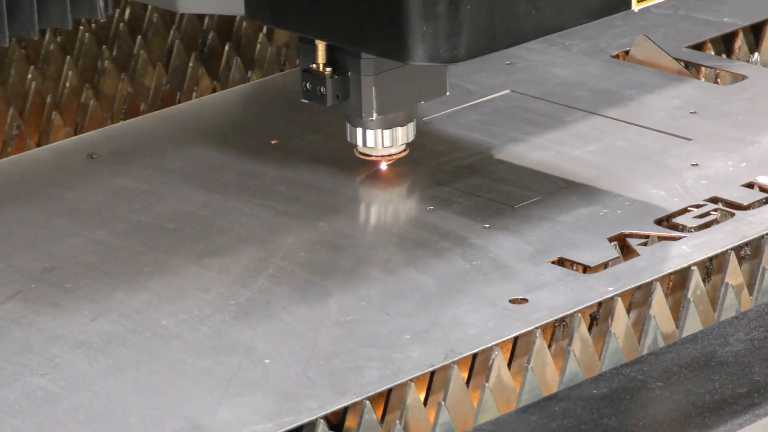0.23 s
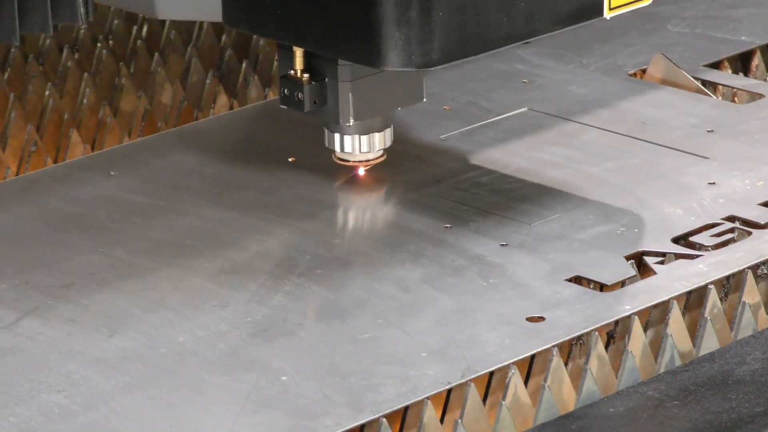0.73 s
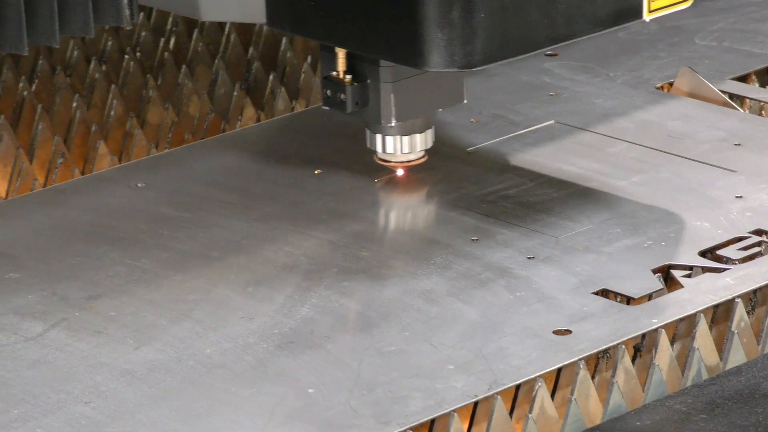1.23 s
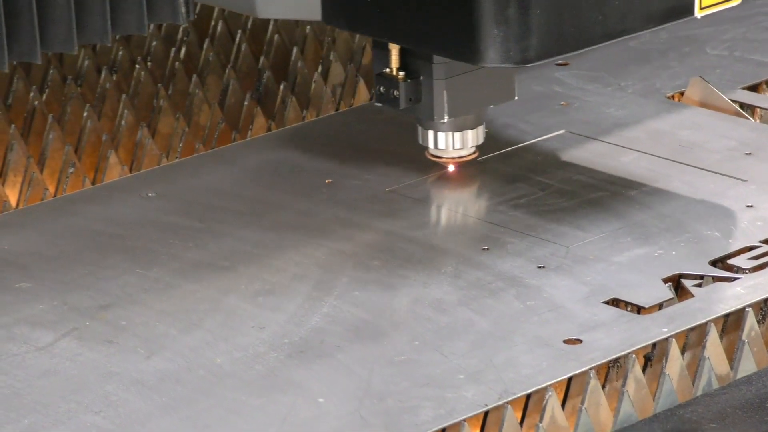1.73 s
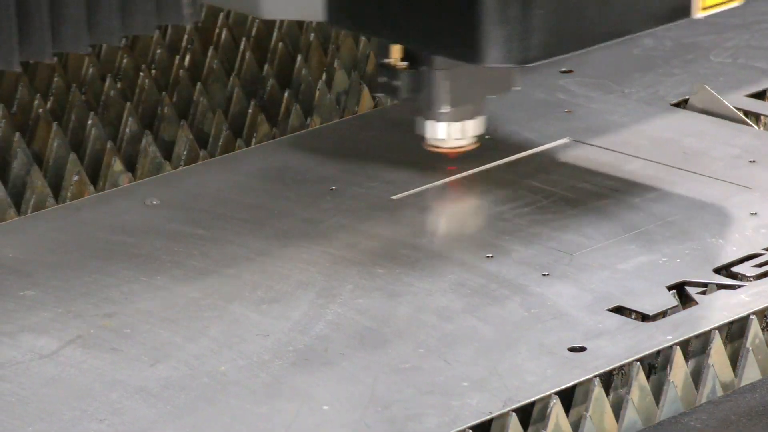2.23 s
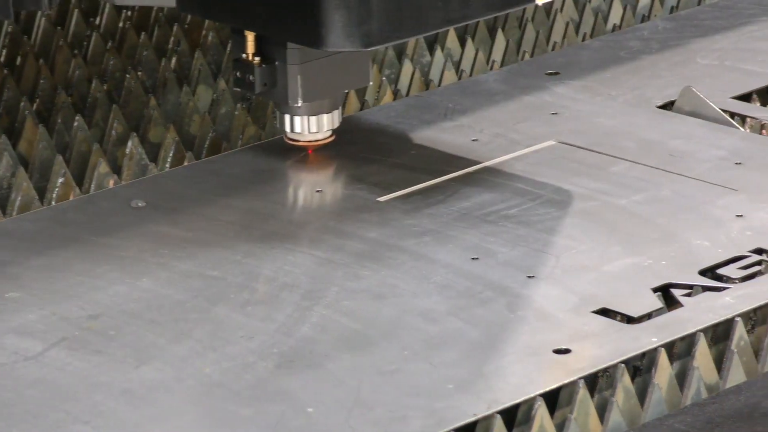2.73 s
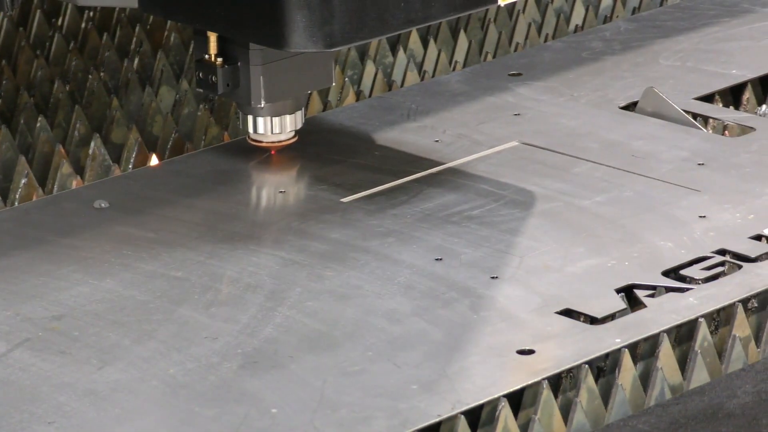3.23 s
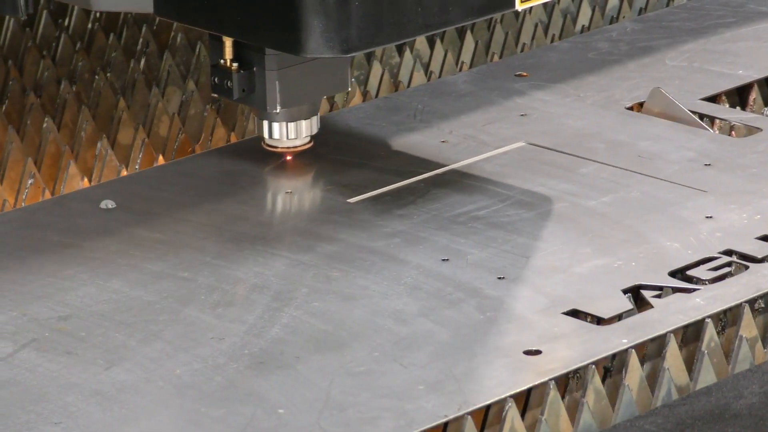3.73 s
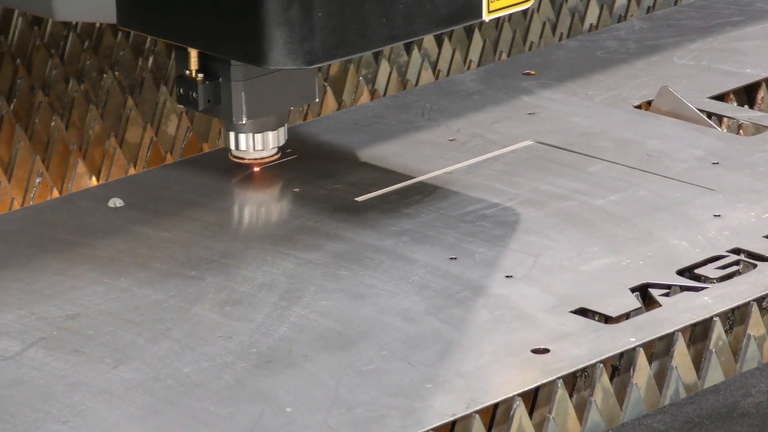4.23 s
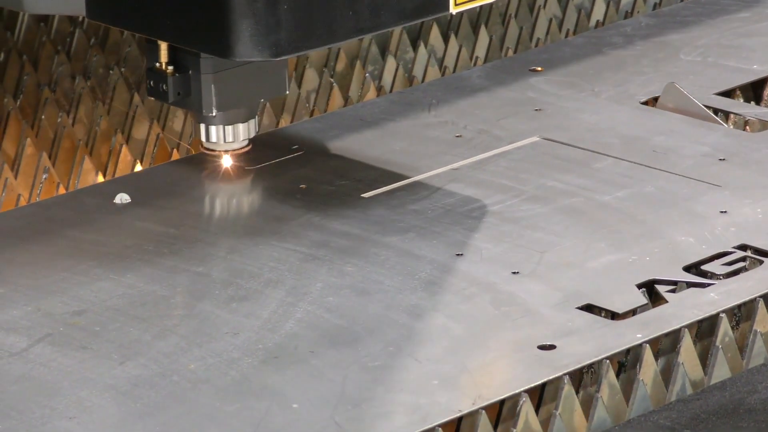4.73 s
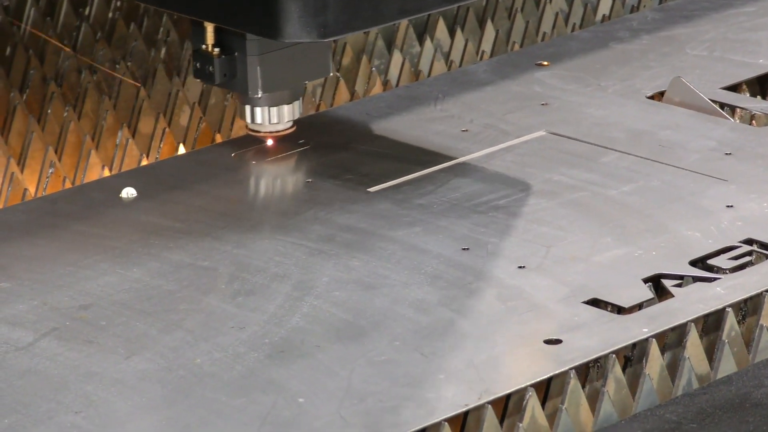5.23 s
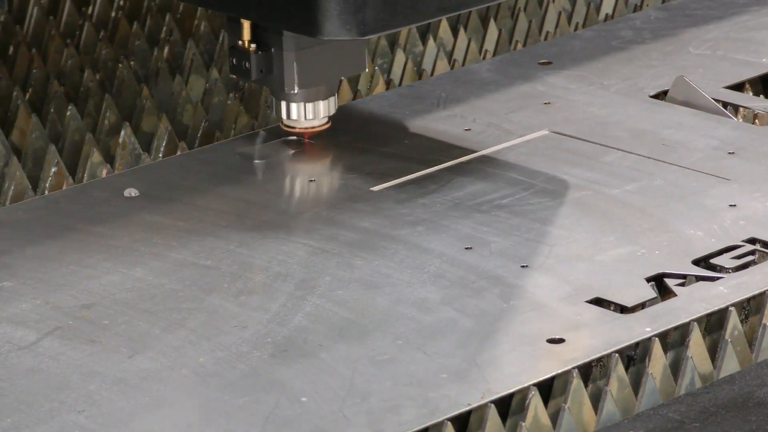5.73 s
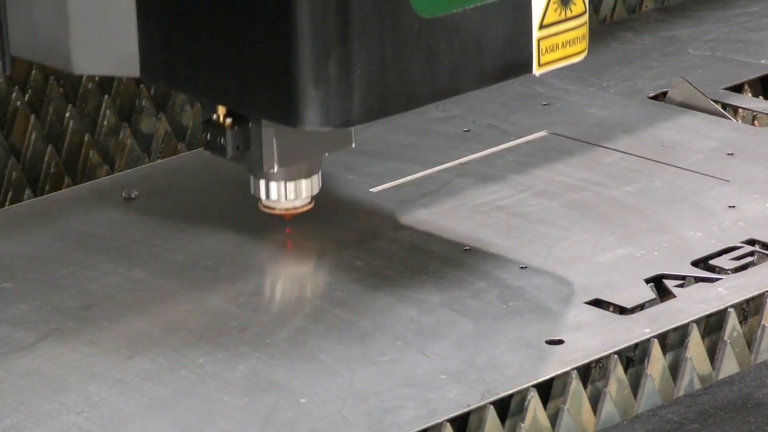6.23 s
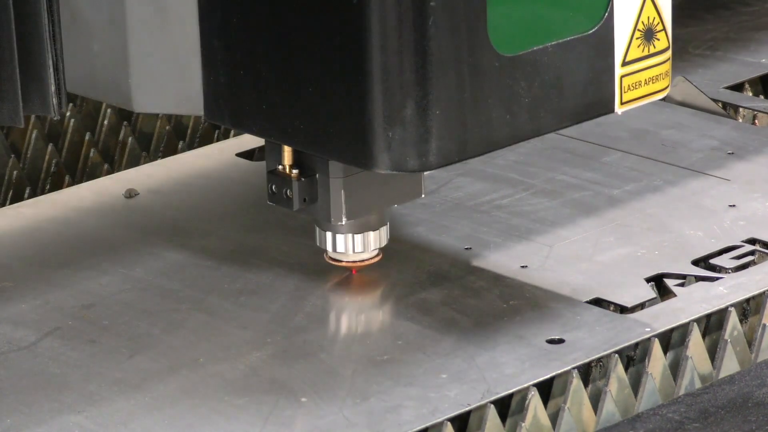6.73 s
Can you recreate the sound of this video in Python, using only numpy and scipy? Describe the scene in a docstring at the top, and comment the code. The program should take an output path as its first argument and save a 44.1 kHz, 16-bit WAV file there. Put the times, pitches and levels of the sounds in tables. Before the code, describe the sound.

A laser cutter works sheet steel, heard close and centred with a short workshop tail. From 0 to 2.2 seconds bright gas hiss runs steadily over a fluttering rasp, fine sizzle and hollow roar from the slatted bed, with quiet pump hum and extractor draught; a faint narrow whistle passes around 1 second. At 2.2 a small spatter ends the cut, the hiss thins, and a rumble climbs from 2.4 to a dull double thump at 2.76. Cutting resumes with a stronger rasp and roar; sizzle and airy whistling grow from 4.7 to 5.7. Cutting stops near 5.9 with a soft gas puff and spatters. Rumble swells from 6.0, a sharp puff bursts at 6.32, and the hiss chokes to a lower rush with thin piercing whistles, further soft puffs and another rumble. A double thump at 6.73 brings back the full bright hiss to the end.

```python
"""Gas hisses from a laser cutter's nozzle, rasps in the kerf of a steel sheet and rings the slatted bed below.
Drive whine and mains hum and a draught in the extractor duct run throughout; narrow whistles come and go. Twice
the cut ends, the nozzle lifts and the frame's rumble swells to a double thump. Gas puffs come late, as the hiss
is choked to a lower rush and thin whistles until the jet returns. Shaped noise makes the gas and rumble, sines
the hum, decaying modes the thumps; a short room tail is added."""
import sys
import numpy as np
from scipy import signal
from scipy.fft import rfft, irfft, next_fast_len
from scipy.io import wavfile
from scipy.ndimage import uniform_filter1d, map_coordinates

SR = 44100
rng = np.random.default_rng(int(sys.argv[2]) if len(sys.argv) > 2 else 0)


def bounce(signal):
    """Save signal as a 16-bit WAV file at the path given by the first command-line argument."""
    frames = np.transpose(np.atleast_2d(signal))
    limited = np.clip(frames, -1, 1)
    pcm = np.round(limited * 32767).astype(np.int16)
    wavfile.write(sys.argv[1], SR, pcm)


N = 308259
TIME = np.arange(N) / SR  # s

# noise spectra, scaled to rms 1 in use: f/Hz, relative density/dB per Hz
# jet on the sheet
HISS_SPECTRUM = [(2500, -24), (5800, -10), (7400, -5), (8400, -0.5), (9400, -2), (10600, 1.5), (11700, 1.2),
                 (12400, 0), (13500, 0.5), (14100, 1), (15400, 2)]
# jet clear of the sheet
LIFTED_HISS_SPECTRUM = [(2000, -24), (9500, -20), (12500, -12), (15200, -6.5)]
# bed roar, kerf rasp, kerf sizzle
BED_SPECTRUM = [(350, -42.5), (600, -15.5), (800, -9.5), (890, -7), (1000, -1), (1190, 1), (1400, -2),
                (1650, -4.5), (2100, -11), (6000, -68.5)]
RASP_SPECTRUM = [(1200, -30), (1900, -5), (2450, 1), (2900, 0), (3250, -1), (3700, -0.5), (4200, -5.5),
                 (5600, -12), (9000, -24), (13000, -55)]
SIZZLE_SPECTRUM = [(3000, -26.5), (4400, -1.5), (4850, 0.5), (5400, 0.5), (5900, -6), (6700, 1.5),
                   (7600, -5), (8600, -4), (11300, -21), (13500, -36)]
# extractor duct, frame rumble
DUCT_SPECTRUM = [(25, -40), (70, -50), (130, -14.5), (220, -7.5), (290, -7.5), (350, -1), (450, 2.5),
                 (580, -5), (720, -4), (1100, -7.5), (4000, -54)]
RUMBLE_SPECTRUM = [(25, -30), (60, -35), (90, -14), (130, -3.5), (235, 3.5), (400, 11), (560, 5),
                   (800, 0.5), (1300, -8), (4000, -53.5)]
# gas puff
PUFF_SPECTRUM = [(60, -40), (600, -28), (1200, -20), (3500, 0), (5000, -4), (7000, -2), (9000, -6),
                 (11500, -6), (13000, -12), (16000, -22)]

# cuts, nozzle down: start/s, end/s, hiss/dB, draught/dB
CUT_ROWS = [(-.1, 2.24, -25.5, -47), (2.76, 5.89, -26, -45), (6.742, 7.1, -24.5, -45)]
# kerf activity, one table per cut: t/s, roar/dB, rasp/dB, sizzle/dB (before the feed offsets)
KERF_LEVELS = [
    [(0.0, -41, -40, -45), (0.07, -44, -51, -47), (0.65, -42, -45, -42), (0.7, -39.5, -48, -47),
     (0.88, -42, -37.5, -39.5), (1.37, -39, -39.5, -39), (1.67, -40, -46, -42.5), (2.17, -39.5, -44.5, -42),
     (2.2, -39, -44, -37)],
    [(2.85, -36, -36, -40), (2.96, -38, -35, -50), (2.99, -40, -37.5, -42), (3.17, -37, -34, -43.5),
     (3.48, -37, -36, -40), (4.01, -35, -41.5, -43.5), (4.6, -36, -37.5, -44), (4.85, -40.5, -38.5, -36),
     (5.51, -40.5, -36.5, -35.5), (5.75, -38, -37.5, -44)],
    [(6.86, -48, -56, -47), (6.956, -41.5, -44, -48), (6.98, -52, -57, -50)],
]
# choked hiss, replaced by a lower rush: start/s, end/s, first hiss drop/dB, rush/dB (before the feed offsets)
HISS_PAUSES = [(2.7, 2.754, -6.5, -47), (6.33, 6.732, -9.5, -30.5)]
# jet catching an edge, bell-shaped in time: centre/s, bell sigma/s, hiss/dB, spatter/dB (before the feed offsets)
EDGE_FLARES = [(2.23, 0.0088, -25, -39), (2.458, 0.039, -30, -40.5), (3.425, 0.014, -26, -45),
               (5.845, 0.041, -30, -35.5), (5.992, 0.043, -36, -35), (6.11, 0.024, -42, -38)]
# rumble as the head travels: start/s, peak/s, peak level/dB, rise/dB per s
RUMBLE_SWELLS = [(2.375, 2.755, -30.5, 54), (6.02, 6.317, -33.5, 44), (6.411, 6.75, -29, 21)]
# drive-whine and mains lines: f/Hz, mean level during cuts/dB rms
HUM_LINES = [(96, -76.5), (120, -69), (192, -62), (240.5, -67.5), (360, -62), (383.7, -53.5), (463, -57.5),
             (576, -79)]
# gas singing at narrow edges: start/s, end/s, f/Hz, half-width at half gain/Hz, level between fades/dB rms
WHISTLE_ROWS = [(0.74, 1.3, 2440, 45, -49), (.9, 1.15, 5100, 200, -46.5), (4.7, 5.7, 4680, 300, -45.5),
                (4.7, 5.7, 8600, 260, -46), (6.37, 6.72, 8520, 26, -38.5), (6.35, 6.74, 12520, 22, -52),
                (6.478, 6.74, 14670, 22, -49), (6.44, 6.74, 15280, 26, -52)]
# knocks: t/s, gain on the frame modes/dB
THUMP_HITS = [(2.7587, -16.5), (2.7725, -22.5), (6.73, -21), (6.739, -19)]
# frame modes: f/Hz, mean relative level/dB, t60/s
FRAME_MODES = [(368, -8.5, 0.1), (517, -3.5, 0.049), (710, 0, 0.02), (970, -1, 0.018), (1200, 2, .025),
               (1680, -24, 0.0096)]
# gas releases: t/s, envelope gain/dB, t60/s
PUFF_ROWS = [(5.793, -26.5, 0.22), (6.3222, -11, 0.049), (6.487, -24, 0.19), (6.631, -31, 0.077)]
# resonances of sheet and housing: f/Hz, width/Hz, gain added at centre/dB
PANEL_MODES = [(705, 41, -11), (1170, 130, -18), (1947, 31, -9), (2250, 5.8, -8), (3167, 70, -4),
               (3450, 17, -7)]
# room decay: f/Hz, t60/s
WORKSHOP_DECAY = [(200, 0.87), (2000, 0.51), (12000, 0.05)]

# offset of each feed into the kerf voices: roar/dB, rasp/dB, sizzle/dB
CUT_FEED_DB = (1, 0, -1)
FLARE_FEED_DB = (-2, -3, -0.5)
RUSH_FEED_DB = (-4.5, 0, -11)
SWELL_FEED_DB = (-1.5, -5.5, -28)
# constant trickle in the kerf voices: roar/dB, rasp/dB, sizzle/dB
TRICKLE_FEED_DB = (-50.5, -46.5, -43)

LIFT_S, LIFT_LOSS_DB, FREE_POWER_SHARE = 0.22, 2, 0.75  # nozzle rise; share of free jet at full lift
CHOKE_DB_PER_S = 35  # further fade of the choked hiss
RUSH_RISE_S, RUSH_FALL_DB_PER_S = 0.032, 145  # full at pause start, falls after pause end
SWELL_ATTACK_S, SWELL_FALL_DB_PER_S = 0.022, 448
DRAUGHT_IDLE_DB, HUM_IDLE_DB = -8, -5  # change between cuts
ROOM_DB = -14
BASS_CORNER_HZ, TOP_HZ, PEAK_LIMIT = 70, 15750, 0.38


def amp(db):
    """Decibels to gain."""
    return 10 ** (np.asarray(db) / 20)


def unit(x):
    """Scale to rms 1."""
    return x / np.sqrt(np.mean(x ** 2) + 1e-20)


def along(points, hz):
    """Interpolate (f/Hz, value) points on a log frequency axis."""
    f, v = np.transpose(points)
    return np.interp(np.log(hz + 1), np.log(f), v)


def curves(rows):
    """One per-sample curve for each column after the time."""
    s, *cols = np.transpose(rows)
    return [np.interp(TIME, s, c) for c in cols]


def wobble(knots_per_s):
    """Smooth random curve: a spline through normal draws."""
    knots = rng.standard_normal(int(N * knots_per_s / SR) + 4)
    return map_coordinates(knots, [TIME * knots_per_s])


def filtered(x, response):
    """Multiply the spectrum of x by a response of frequency."""
    m = next_fast_len(N + 8192)
    return irfft(rfft(x, m) * response(np.fft.rfftfreq(m, 1 / SR)), m)[..., :N]


def rush(spectrum, patchy_db):
    """Turbulent noise of rms 1: eddies give random gain patches in time and frequency."""
    z = signal.stft(rng.standard_normal(N), nperseg=512)[2]
    field = uniform_filter1d(rng.standard_normal(z.shape), size=7, axis=0)
    field = uniform_filter1d(field, size=12, axis=1)
    noise = signal.istft(z * amp(patchy_db * unit(field)), nperseg=512)[1][:N]
    return unit(filtered(noise, lambda hz: amp(along(spectrum, hz))))


def gate(start_s, end_s, edge_s):
    """1 from start to end, with ramps centred on both."""
    return np.clip(np.minimum(TIME - start_s, end_s - TIME) / edge_s + .5, 0, 1)


def together(*gains):
    """Unrelated flows add in power."""
    return np.sqrt(sum(g ** 2 for g in gains))


def latest_cut():
    """Columns of the cut that began last, per sample."""
    rows = np.array(CUT_ROWS)
    return rows[np.maximum(np.searchsorted(rows[:, 0], TIME) - 1, 0)].T


def cutting(idle_db, edge_s=0.046):
    """Gain of 1 during cuts, idle_db between them."""
    active = sum(gate(start, end, edge_s) for start, end, *_ in CUT_ROWS)
    return amp(idle_db * (1 - active))


def flares():
    """Bell-shaped flare gains: in the hiss, in the kerf."""
    s, sigma_s, hiss_db, spatter_db = np.transpose(EDGE_FLARES)
    bells = np.exp(-.5 * ((TIME - s[:, None]) / sigma_s[:, None]) ** 2)
    return amp(hiss_db) @ bells, amp(spatter_db) @ bells


def swells():
    """Swell gain: climbs steadily in dB, collapses after the peak."""
    total = np.zeros(N)
    for start, peak, peak_db, rise_db_per_s in RUMBLE_SWELLS:
        attack = np.clip((TIME - start) / SWELL_ATTACK_S, 0, 1)
        below_peak_db = np.maximum(rise_db_per_s * (peak - TIME), SWELL_FALL_DB_PER_S * (TIME - peak))
        total += attack * amp(peak_db - below_peak_db)
    return total


def jet(choke_edge_s=0.038):
    """Fine hiss of gas striking the sheet; thins as the nozzle rises after each cut, drops when choked."""
    _, cut_end, hiss_db, _ = latest_cut()
    lift = np.clip((TIME - cut_end) / LIFT_S, 0, 1)
    free = FREE_POWER_SHARE * np.sqrt(lift)
    struck = np.sqrt(1 - free) * rush(HISS_SPECTRUM, patchy_db=0.75)
    lifted = np.sqrt(free) * rush(LIFTED_HISS_SPECTRUM, patchy_db=2.5)
    choke_db = np.zeros(N)
    for start, end, drop_db, _ in HISS_PAUSES:
        choke_db += (drop_db - CHOKE_DB_PER_S * (TIME - start)) * gate(start, end, choke_edge_s)
    steady = amp(hiss_db - LIFT_LOSS_DB * lift ** 2 + choke_db)
    return together(steady, flares()[0]) * amp(0.33 * wobble(35)) * (struck + lifted)


def kerf_gains(edge_s=.035):
    """Roar, rasp and sizzle gains, fed by cuts, flares, choked-jet rush, swells and a trickle."""
    cuts = np.zeros((3, N))
    for (start, end, *_), rows in zip(CUT_ROWS, KERF_LEVELS):
        cuts += gate(start, end, edge_s) * amp(curves(rows))
    choked = np.zeros(N)
    for start, end, _, rush_db in HISS_PAUSES:
        rise = np.clip((TIME - start) / RUSH_RISE_S + 1, 0, 1)
        choked += rise * amp(rush_db - RUSH_FALL_DB_PER_S * np.maximum(TIME - end, 0))
    feeds = [(CUT_FEED_DB, cuts), (FLARE_FEED_DB, flares()[1]), (RUSH_FEED_DB, choked),
             (SWELL_FEED_DB, swells()), (TRICKLE_FEED_DB, 1)]
    return together(*(amp(db)[:, None] * feed for db, feed in feeds))


def cut():
    """Gas and melt blow through the kerf, fluttering, and ring the hollow bed."""
    roar_gain, rasp_gain, sizzle_gain = kerf_gains()
    flutter = wobble(45)  # shared by bed and rasp
    bed = roar_gain * amp(0.54 * flutter + 0.38 * wobble(16)) * rush(BED_SPECTRUM, patchy_db=0.23)
    rasp = rasp_gain * amp(0.73 * flutter) * rush(RASP_SPECTRUM, patchy_db=0.5)
    sizzle = sizzle_gain * amp(1.1 * wobble(120)) * rush(SIZZLE_SPECTRUM, patchy_db=1.06)
    return bed + rasp + sizzle


def machine():
    """Extractor-duct draught, weaker between cuts, plus the frame's swelling rumble."""
    draught_db = latest_cut()[-1] + 0.14 * wobble(3.1)
    draught = cutting(DRAUGHT_IDLE_DB) * amp(draught_db) * rush(DUCT_SPECTRUM, patchy_db=1.5)
    return draught + swells() * rush(RUMBLE_SPECTRUM, patchy_db=3.0)


def hum():
    """Drive-whine and mains sines, unsteady in level and phase, weaker while the laser is off."""
    out = np.zeros(N)
    for hz, db in HUM_LINES:
        swell_db, drift_rad = 1.8 * wobble(9), .55 * wobble(8)
        out += np.sqrt(2) * amp(db + swell_db) * np.sin(2 * np.pi * hz * TIME + drift_rad)
    return cutting(HUM_IDLE_DB) * out


def whistles(fade_s=0.071):
    """Turbulence drives narrow resonances at nozzle and kerf: tones that swell in beads."""
    out = np.zeros(N)
    for start, end, hz, half_width_hz, db in WHISTLE_ROWS:
        fade = np.clip(np.minimum(TIME - start, end - TIME) / fade_s, 0, 1)
        tone = filtered(rng.standard_normal(N), lambda f: 1 / (1 + ((f - hz) / half_width_hz) ** 2))
        out += amp(db) * fade * unit(tone)
    return out


def thumps(attack_s=0.0004):
    """Dull double knocks: each blow rings the frame modes at random strengths and phases."""
    out, t = np.zeros(N), np.arange(SR // 5) / SR
    for s, db in THUMP_HITS:
        ring = np.zeros(len(t))
        for hz, level_db, t60_s in FRAME_MODES:
            strength = amp(level_db + rng.normal(0, 2.9))
            decay = np.exp(-np.log(1000) * t / t60_s)
            ring += strength * decay * np.sin(2 * np.pi * (hz * t + rng.random()))
        out[round(s * SR):][:len(t)] += amp(db) * (1 - np.exp(-t / attack_s)) * ring
    return out


def puffs(attack_s=0.00079):
    """Sudden pressure releases: noise with a quick rise and exponential decay."""
    envelope = np.zeros(N)
    for s, db, t60_s in PUFF_ROWS:
        age_s = np.maximum(TIME - s, 0)
        envelope += amp(db) * (1 - np.exp(-age_s / attack_s)) * np.exp(-np.log(1000) * age_s / t60_s)
    return envelope * rush(PUFF_SPECTRUM, patchy_db=1.5)


def panels(x):
    """Sheet and housing resonances lift a few narrow bands."""
    def response(f):
        total = 1
        for centre_hz, width_hz, db in PANEL_MODES:
            damping = 1j * f * width_hz
            total = total + amp(db) * damping / (centre_hz ** 2 - f * f + damping)
        return total
    return filtered(x, response)


def workshop(x):
    """Room tail: noise of unit energy, each frequency decaying at its own speed."""
    hz, t, z = signal.stft(rng.standard_normal(SR // 2), SR, nperseg=256)
    decay = np.exp(-np.log(1000) * t / along(WORKSHOP_DECAY, hz)[:, None])
    tail = signal.istft(z * decay, SR, nperseg=256)[1]
    return signal.fftconvolve(x, tail / np.linalg.norm(tail))[:N]


def scene():
    """Machine straight ahead, identical in both channels; only the body feeds the room."""
    body = panels(cut() + machine() + thumps() + puffs())
    mid = body + amp(ROOM_DB) * workshop(body) + jet() + hum() + whistles()
    return np.array([mid, mid])


def record(dry):
    """Thin the deep bass, round the highest peaks, remove everything from TOP_HZ up."""
    thin = filtered(dry, lambda hz: hz ** 2 / np.sqrt(hz ** 4 + BASS_CORNER_HZ ** 4))
    rounded = thin / (1 + (thin / PEAK_LIMIT) ** 4) ** (1 / 4)
    return filtered(rounded, lambda hz: hz < TOP_HZ)


dry = scene()
out = record(dry)
bounce(out)
```